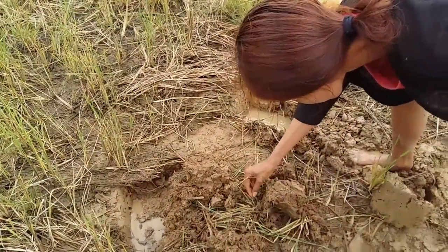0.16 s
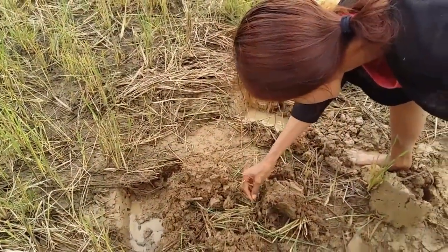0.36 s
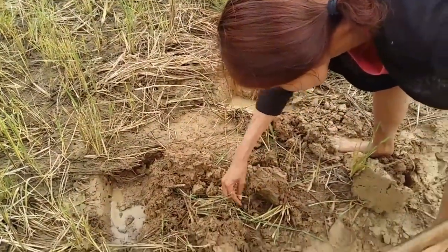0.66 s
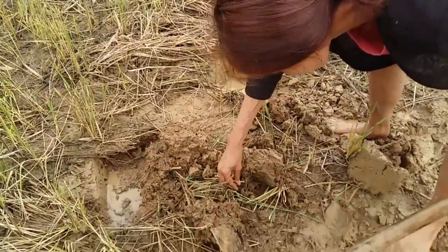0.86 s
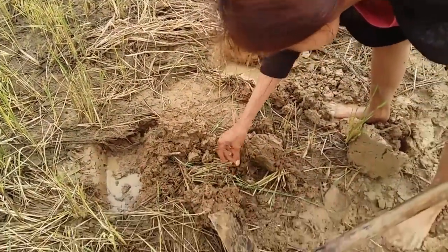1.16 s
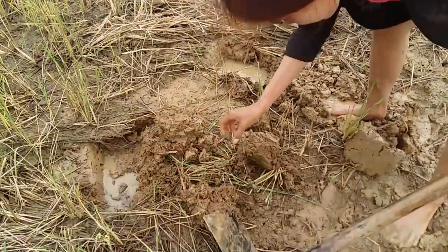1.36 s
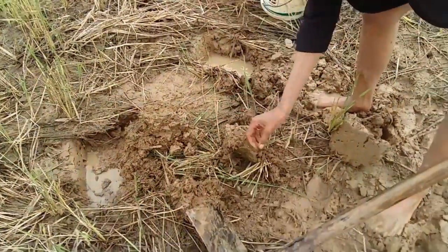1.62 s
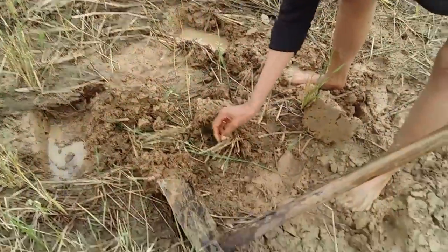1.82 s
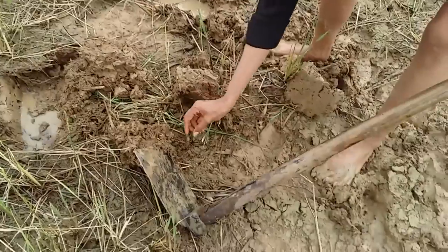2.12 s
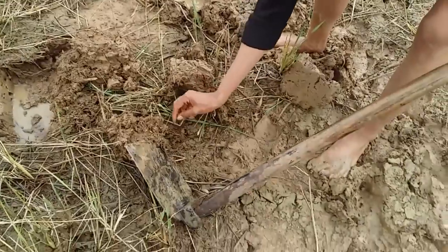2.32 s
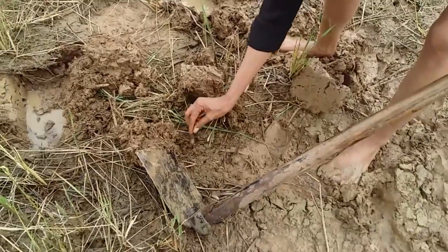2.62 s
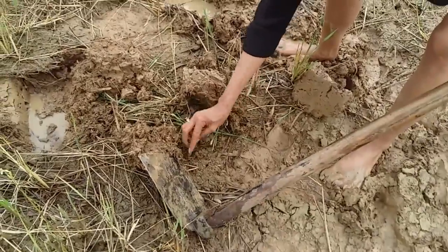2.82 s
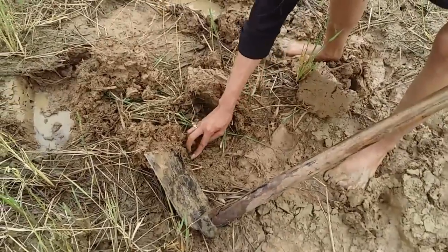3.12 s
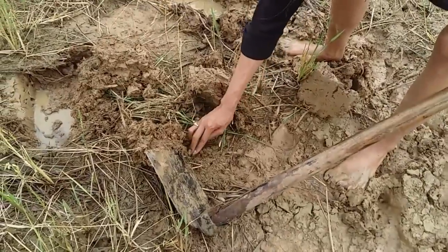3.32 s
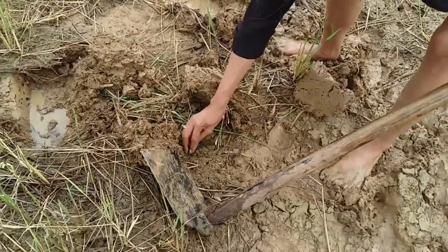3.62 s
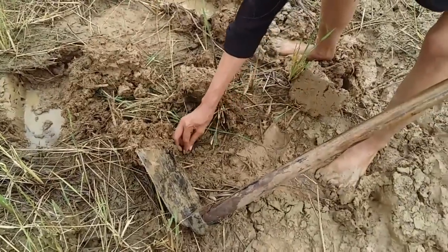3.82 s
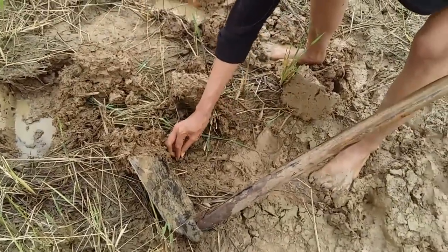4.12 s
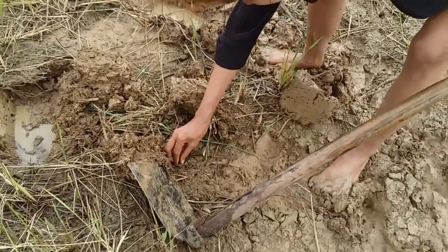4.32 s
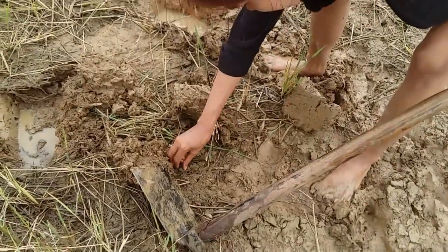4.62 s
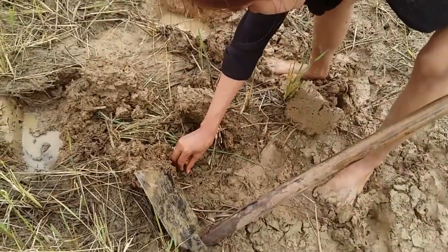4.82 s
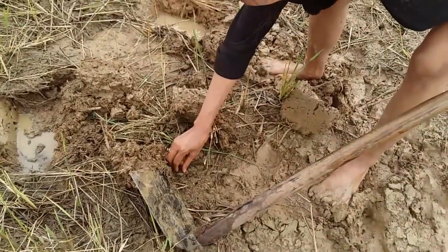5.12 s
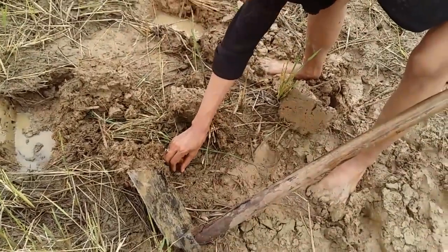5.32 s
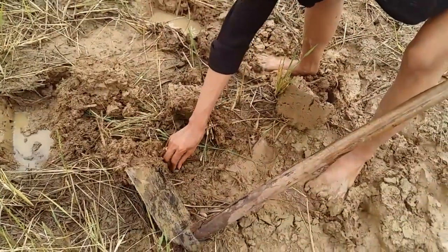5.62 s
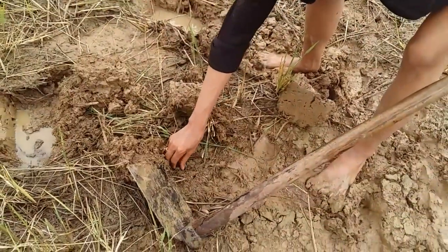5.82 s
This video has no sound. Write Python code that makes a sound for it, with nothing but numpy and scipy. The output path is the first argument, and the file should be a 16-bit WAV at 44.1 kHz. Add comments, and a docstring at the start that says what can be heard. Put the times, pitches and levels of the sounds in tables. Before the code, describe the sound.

A low wind rumble sits on the microphone for the whole six seconds, in an otherwise quiet open field. Mixed into it, slightly to the left, a distant diesel engine chugs at about nine beats a second, with other far engines humming and a soft airy hiss behind. The diesel has a light metallic clatter that fades out by about 2.5 seconds. Close by, a hand stirs soil and straw in short, faint, grainy scrapes, around 0.6 to 0.8 seconds, scattered from 1.4 to 2.9, then near 4 and 5 seconds. Far birds give tiny high chips in threes from 0.7 seconds onward. A nearer small bird on the right makes brief gliding chirps at about 2.3, 3.4, 3.8 and 5.4 seconds. Insects buzz very faintly, with a thin chorus rising on the right at around 3 seconds.

```python
"""A far diesel chugs across an open field: each firing thumps from the exhaust, and the early ones also
rattle and ring the casing. Other engines hum, and wind rumbles on a microphone held over the soil.
The microphone turns around the two-second mark, so the distant hiss changes colour and the clatter fades.
Small birds chirp in gliding whistles, insects buzz faintly, and a hand stirs soil and straw."""
import sys
import numpy as np
from scipy import signal
from scipy.fft import rfft, irfft, next_fast_len
from scipy.io import wavfile
from scipy.ndimage import uniform_filter1d, map_coordinates

SR = 44100
rng = np.random.default_rng(int(sys.argv[2]) if len(sys.argv) > 2 else 0)


def store_wav(level_fs):
    """Save 16-bit WAV to argv[1]."""
    pcm = np.round(np.clip(np.atleast_2d(level_fs), -1, 1) * 32767)
    wavfile.write(sys.argv[1], SR, pcm.T.astype(np.int16))


N = 262836
TIME = np.arange(N) / SR
TURN_START_S, TURN_END_S = 1.22, 3.14

# stereo image of the noise beds: frequency_hz, left_right_correlation
STEREO_LIKENESS = [(40, 0.72), (70, 0.96), (130, 1), (290, 0.89), (640, 0.46), (1400, 0.72), (2500, 0.84),
                   (4000, 0.39), (8000, 0.14), (15000, 0.048)]
# colours of the distant air: frequency_hz, relative_db
HISS_COLOUR_BEFORE = [(600, -31), (800, -8), (1000, -9), (1370, 2), (1650, -3), (2250, 2), (2850, 1.5),
                      (3350, -9.5), (3850, -4), (4250, -17), (4800, -9), (5400, -17.5), (6100, -25),
                      (7500, -40)]
HISS_COLOUR_AFTER = [(700, -23), (950, -4), (1120, 3.5), (1400, 2), (2000, -5.5), (2600, 5.5), (2950, -7),
                     (3400, 5), (3700, -8.5), (4050, -15), (4600, -10), (5700, -15), (6700, -20.5),
                     (7800, -41)]
MURMUR_COLOUR = [(200, 0.5), (330, -1.5), (480, -1.5), (620, -1), (800, -2), (1000, -4), (1400, -8.5)]
FIZZ_COLOUR = [(5000, -0.5), (7000, 1), (8100, -3), (8650, 4.5), (9200, -1.5), (10100, -3), (11100, 0),
               (12300, -7.5), (15600, -8.5)]
# balance before and after the turn: frequency_hz, left_over_right_db
BALANCE_BEFORE = [(1000, 4.5), (1400, 0), (1650, -1), (2100, -7.5), (3100, 1.5), (3800, -4.5), (4700, 4),
                  (6200, 9.5)]
BALANCE_AFTER = [(1000, 5), (1400, -5.5), (2100, 1.5), (2600, -2.5), (3100, -3), (4000, 3), (5000, 0),
                 (6600, 9.5)]
# fader ride of the murmur: time_s, relative_db
MURMUR_RIDE = [(0, -62), (.7, -58.5), (1.8, -60), (3.1, -63), (4.4, -64.5), (5.2, -61), (5.9, -62)]
# buzzes of a lone insect: middle_s, level_db
INSECT_BUZZES = [(.8, -80), (2.18, -74), (2.5, -75), (5.44, -73), (5.77, -75)]
# a bird's flick, which holds, peaks and plunges: time_s, base_pitch_hz, relative_db
FLICK_CONTOUR = [(0, 4064, -19), (.014, 3923, -6.5), (.021, 4060, -2), (.026, 5130, -11.5),
                 (.031, 3954, -4.5), (.038, 3340, -0.5), (.047, 2360, 3)]
# the arch of its buzz: time_s, pitch_over_crest, relative_db
BUZZ_CONTOUR = [(0, .7, 5.5), (.012, .96, 1), (.02, 1.03, 3.5), (.042, .98, 1.5), (.057, .9, 2.5),
                (.074, 0.74, -10)]
# the near bird's calls: start_s, flick_db, flick_pitch_ratio, buzz_db, crest_hz
NEAR_CALLS = [(2.257, -48, 0.97, -50, 3290), (3.795, -52.5, 0.97, -53, 3150),
              (5.381, -54, 1.07, -56.5, 3156)]
# near falling slurs and far rising whistles: start_s, start_pitch_hz, level_db
NEAR_SLURS = [(3.386, 3190, -55), (3.458, 3150, -53.5), (5.842, 2850, -58)]
FAR_WHISTLES = [(.8, 3710, -68), (1.29, 3720, -64)]
# far chips in threes: start_s, start_pitch_hz, middle_chip_db, spacing_s
FAR_TRIPLETS = [(.731, 5630, -58.5, 0.034), (.98, 5240, -64, 0.041), (1.184, 5140, -67, 0.036),
                (1.526, 5650, -59.5, 0.035), (2.465, 5670, -63.5, 0.035), (3.293, 5700, -63, 0.036),
                (4.121, 5710, -61.5, 0.037), (4.927, 5680, -64.5, 0.035), (5.432, 4800, -69, 0.033),
                (5.748, 5660, -67, 0.036)]
# soil and straw under the hand, plus two late knocks of the far diesel (2.099 s and 2.856 s): start_s,
# level_db, length_s, centre_hz
SOIL_SCRAPES = [(0.566, -52, 0.014, 2300), (0.653, -52, .024, 2470), (0.715, -47.5, 0.018, 2460),
                (0.774, -46, .03, 2340), (1.425, -51.5, 0.019, 2190), (1.439, -59.5, 0.0086, 5040),
                (1.77, -60, 0.011, 5500), (1.602, -72, 0.2, 6410), (2.099, -53, 0.017, 2820),
                (2.207, -52, 0.011, 2400), (2.856, -54, 0.021, 2450), (3.741, -48.5, 0.024, 2580),
                (3.948, -53, .02, 2600), (4.076, -52.5, 0.016, 2620), (4.918, -66, 0.0035, 6300),
                (5.061, -53.5, 0.032, 2600), (5.157, -53.5, 0.011, 2300), (5.185, -53.5, 0.029, 2800)]
# colour of the wind rumble: frequency_hz, relative_db
WIND_COLOUR = [(22, -26), (34, -26), (45, -28), (54, -2.5), (90, -1), (116, -4), (130, -3), (165, -4.5),
               (186, -9), (202, -7.5), (218, -11.5), (245, -11), (320, -24), (450, -31.5)]
# its gusts: time_s, level_db
WIND_RIDE = [(0, -39.5), (.2, -45.5), (.32, -44), (.55, -46), (.7, -42), (1, -45), (1.7, -44.5), (2.5, -46),
             (3.3, -43.5), (4.2, -44.5), (4.32, -41.5), (4.48, -46.5), (4.65, -44), (5.1, -44),
             (5.95, -43.5)]
# overtones of a faster engine: multiple_of_firing_rate, relative_db
ENGINE_OVERTONES = [(9, -1.5), (10, 2), (11, 1.5), (12, -4.5)]
# speed of the diesel: time_s, firing_rate_hz
DIESEL_RATE = [(0, 9.13), (1.1, 9.18), (1.5, 8.88), (2.6, 8.88), (3.2, 9.29), (3.7, 9.08), (4.4, 9.11),
               (4.8, 8.85), (5.5, 8.65)]
# colour of its rattle: frequency_hz, relative_db
CLATTER_COLOUR = [(600, -33), (1150, -13), (1370, -11), (1560, -2.5), (1800, 2), (2050, -4), (2450, 4.5),
                  (2900, -2), (3400, -13.5), (5200, -14.5), (7000, -36.5)]
# its knocks, about nine a second: start_s, rattle_relative_db, ring_relative_db
DIESEL_KNOCKS = [(0, -40.5, -57), (.086, -47, -43.5), (0.195, -42, -53), (0.317, -41, -49),
                 (0.432, -44, -48), (0.527, -42.5, -47), (0.649, -42, -52), (.742, -42, -47),
                 (0.849, -42, -54), (0.971, -43, -55), (1.067, -44.5, -55), (1.176, -46, -47),
                 (1.288, -43, -46), (1.396, -47, -56), (1.512, -47, -45.5), (1.624, -48, -55),
                 (1.736, -42.5, -44), (1.85, -46, -48), (1.977, -47, -49), (2.075, -46.5, -51),
                 (2.188, -48, -60), (2.415, -48.5, -48)]
# exhaust thumps after each firing: delay_s, pitch_hz, relative_db, attack_s
EXHAUST_THUMPS = [(0, 247, -3, 0.0044), (.007, 125, -1.5, .004), (.03, 158, 1, 0.0065),
                  (.078, 114, 2, .005)]
# fader ride of the exhaust: time_s, level_db
EXHAUST_RIDE = [(0, -48.5), (.7, -48.5), (2, -46.5), (3.3, -46), (3.8, -50), (4.75, -47), (5.9, -51.5)]


def amp(db):
    return 10 ** (np.asarray(db) / 20)


def unit(x):
    return x / np.sqrt(np.mean(x ** 2) + 1e-20)


def along(points, hz):
    """Read a curve on a log frequency axis."""
    knots_hz, values = np.transpose(points)
    return np.interp(np.log(hz + 1), np.log(knots_hz + 1), values)


def curve(rows):
    """An automation lane through (time_s, value) points."""
    return np.interp(TIME, *np.transpose(rows))


def wobble(rate_hz):
    """A smooth random drift."""
    knots = rng.standard_normal(int(N * rate_hz / SR) + 4)
    coarse = np.linspace(0, N / SR, 8 * len(knots))
    return np.interp(TIME, coarse, map_coordinates(knots, [coarse * rate_hz]))


def filtered(x, response):
    """Equalise x with a gain that depends on frequency."""
    size = next_fast_len(N + SR // 2)
    return irfft(rfft(x, size) * response(np.fft.rfftfreq(size, 1 / SR)), size)[..., :N]


def pan(lean_db):
    """Stereo gains; positive leans left."""
    return amp(np.array([[.5], [-.5]]) * lean_db)


def add(track, start_s, sound):
    """Mix a sound into a track."""
    part = track[..., max(0, round(start_s * SR)):][..., :sound.shape[-1]]
    part += sound[..., :part.shape[-1]]


def noise_bed(spectrum, balance=((1000, 0),), pulse=1):
    """Coloured noise of rms 1, narrow in the bass and wide in the treble."""
    def colour(hz):
        width = np.arccos(np.clip(along(STEREO_LIKENESS, hz), -1, 1)) / 2
        band_limit = (hz > spectrum[0][0] / 2) / (1 + (hz / spectrum[-1][0] / 2) ** 10)
        return amp(along(spectrum, hz)) * band_limit * [np.cos(width), np.sin(width)]
    mid, side = filtered(pulse * rng.standard_normal((2, N)), colour)
    return unit(filtered(np.array([mid + side, mid - side]), lambda hz: pan(along(balance, hz))))


def band(centre_hz, octaves):
    """Stereo noise of rms 1 around one pitch."""
    bell = lambda hz: np.exp(-.5 * (np.log2((hz + 1) / centre_hz) / octaves) ** 2)
    return unit(filtered(rng.standard_normal((2, N)), bell))


def moving_air(x, depth_db):
    """Moving air raises and lowers small patches of a distant sound."""
    spectrogram = signal.stft(x, nperseg=512)[2]
    patches = uniform_filter1d(rng.standard_normal(spectrogram.shape[1:]), size=4, axis=0)
    patches = unit(uniform_filter1d(patches, size=18, axis=1))
    return unit(signal.istft(spectrogram * amp(depth_db * patches), nperseg=512)[1][:, :N])


def from_left(x, lead_s=.00009):
    """Distant sound reaches the left port a moment before the right."""
    return filtered(x, lambda hz: np.exp(np.pi * 1j * hz * lead_s * np.array([[1], [-1]])))


def turn_angle():
    """How far the microphone has turned, from 0 to a quarter circle."""
    return np.interp(TIME, [TURN_START_S, TURN_END_S], [0, 1]) * np.pi / 2


def distant_air(fade_db_per_s=0.98):
    """Hiss, murmur, drone and fizz; the turn crossfades two hiss colours and loses the drone."""
    turned = turn_angle()
    before = amp(-53.2) * moving_air(noise_bed(HISS_COLOUR_BEFORE, BALANCE_BEFORE), depth_db=2)
    after = amp(-51.5) * moving_air(noise_bed(HISS_COLOUR_AFTER, BALANCE_AFTER), depth_db=1.86)
    chug = amp(-np.cos(2 * np.pi * firings()))  # a slight pulse in step with the diesel
    fade = amp(0.57 * wobble(25.1) - fade_db_per_s * TIME)
    hiss = fade * (np.cos(turned) * before + np.sin(turned) * chug * after)
    murmur = amp(curve(MURMUR_RIDE) + 0.93) * moving_air(noise_bed(MURMUR_COLOUR), depth_db=1.5)
    drone = amp(-71) * np.cos(turned) * band(768.6, octaves=0.046)[0]
    fizz = amp(-71) * moving_air(noise_bed(FIZZ_COLOUR), depth_db=3)
    return hiss + murmur * pan(0.68) + drone + fizz


def insects(full_s=3.37, rise_db_per_s=16, half_buzz_s=0.084):
    """A far chorus shrills in on the right with the turn; a lone insect gives brief, thin buzzes."""
    chorus_db = -63.5 - rise_db_per_s * np.maximum(full_s - TIME, 0)
    chorus = amp(chorus_db) * band(3270, octaves=0.1) * pan(-5)
    swells = sum(amp(db) * np.exp(-((TIME - s) / half_buzz_s) ** 4) for s, db in INSECT_BUZZES)
    return chorus + swells * band(7250, octaves=0.081)


def whistle(hz, edge, rasp):
    """A bird's tone with raspy pitch jitter; edge is the share spent fading in and out."""
    t = np.arange(len(hz)) / SR
    jitter = np.interp(t, np.arange(200) / 900, rng.standard_normal(200))
    envelope = signal.windows.tukey(len(t), edge)
    return envelope * np.sin(2 * np.pi * np.cumsum(hz * (1 + rasp * jitter)) / SR)


def glide(start_hz, rasp, length_s=0.0257, end_ratio=.915):
    """A soft-edged sliding note, by default a short falling chip."""
    return whistle(start_hz * np.linspace(1, end_ratio, int(length_s * SR)), edge=0.61, rasp=rasp)


def contour(points):
    """Time, pitch and level along a note."""
    s, pitch, db = np.transpose(points)
    t = np.arange(int(s.max() * SR)) / SR
    return t, np.interp(t, s, pitch), np.interp(t, s, db)


def flick(pitch_ratio):
    """A hoarse whistle that holds, flicks up and plunges; it is roughest at the top."""
    t, hz, db = contour(FLICK_CONTOUR)
    jitter = np.interp(t, np.arange(100) / 1200, rng.standard_normal(100))
    hoarse = 1 + 0.068 * (hz / hz.max()) ** 2 * jitter
    return amp(db) * whistle(pitch_ratio * hz * hoarse, edge=0.11, rasp=0.041)


def buzz(crest_hz, warble_hz=115.8, warble_from_s=0.01365):
    """A note that climbs smoothly, then sinks in a warble, loudest in its pitch troughs."""
    t, pitch, db = contour(BUZZ_CONTOUR)
    cycles = (t - warble_from_s) * warble_hz
    warble = np.clip(2 * cycles, 0, 1) * np.sin(2 * np.pi * cycles)
    hz = crest_hz * pitch * (1 + 0.092 * warble)
    return amp(db - 3.5 * warble) * whistle(hz, edge=0.11, rasp=0.041)


def outdoors(x, wet_db, t60_s=0.15):
    """Plants and ground scatter a short diffuse tail behind a call."""
    t = np.arange(SR // 3) / SR
    tail = rng.standard_normal((2, len(t))) * amp(-60 * t / t60_s)
    tail /= np.linalg.norm(tail[0])
    return x + amp(wet_db) * signal.fftconvolve(x[None], tail, axes=1)[:, :N]


def birds(buzz_delay_s=.061, swell_db=1):
    """One bird flicks, buzzes and slurs on the right; farther ones chip in swelling threes and whistle."""
    near, far = np.zeros((2, N))
    for s, flick_db, pitch_ratio, buzz_db, crest_hz in NEAR_CALLS:
        add(near, s, amp(flick_db) * flick(pitch_ratio))
        add(near, s + buzz_delay_s, amp(buzz_db) * buzz(crest_hz))
    for s, hz, db in NEAR_SLURS:
        add(near, s, amp(db) * glide(hz, rasp=0.019, length_s=0.0331, end_ratio=.86))
    for s, hz, db, spacing_s in FAR_TRIPLETS:
        add(far, s - 0.03, amp(db - 10) * glide(hz, rasp=0.027))  # a faint lead-in chip
        for k in range(3):
            add(far, s + k * spacing_s, amp(db + (k - 1) * swell_db) * glide(hz, rasp=0.02))
    for s, hz, db in FAR_WHISTLES:
        add(far, s, amp(db) * glide(hz, rasp=0.015, length_s=.16, end_ratio=1.05))
    flutter = amp(wobble(200))
    return outdoors(flutter * near, wet_db=-5.5) * pan(-9) + outdoors(flutter * far, wet_db=-4)


def soil(octaves=0.24):
    """A hand stirs crumbs and straw into short grainy scrapes; two late knocks of the far diesel sound the same
    way."""
    out = np.zeros((2, N))
    for s, db, length_s, centre_hz in SOIL_SCRAPES:
        age = np.arange(int(4 * length_s * SR)) / (length_s * SR / 2)  # 1 at the peak
        edges_hz = [centre_hz * 2 ** -octaves, centre_hz * 2 ** octaves]
        grains = rng.laplace(size=(2, len(age)))
        scrape = signal.sosfilt(signal.butter(2, edges_hz, "bandpass", fs=SR, output="sos"), grains)
        add(out, s, amp(db) * age * np.exp(1 - age) * unit(scrape))
    return out


def wind(throb_depth=0.21):
    """Wind rumbles on the microphone; the rumble throbs three times per diesel firing."""
    throb = 1 + throb_depth * np.cos(3 * 2 * np.pi * firings())
    return amp(curve(WIND_RIDE)) * noise_bed(WIND_COLOUR, pulse=throb)


def shaft_phase(rate_hz, drift):
    """Phase of a shaft whose speed wanders a little."""
    return 2 * np.pi * np.cumsum(rate_hz * (1 + drift * wobble(2))) / SR


def engine_hum(beat_s=3.78, crest_s=4.78, turn_lift_db=11):
    """Far engines drone: one hum beats slowly, a lower one wavers, and overtones lift in mid-turn."""
    beat = 1 + 0.97 * np.cos(2 * np.pi * (TIME - crest_s) / beat_s)
    hum = amp(-49.5) * beat * np.sin(shaft_phase(74.4, drift=0.00809))
    low_hum = amp(-55 + 3 * wobble(2.4)) * np.sin(shaft_phase(64.1, drift=0.0053))
    phase = shaft_phase(39.6, drift=0.0041)
    overtones = sum(amp(db + 3.2 * wobble(8.6)) * np.sin(k * phase + 0.74 * wobble(12))
                    for k, db in ENGINE_OVERTONES)
    overtones_db = -77 + turn_lift_db * np.sin(2 * turn_angle()) ** 2
    return hum + low_hum + amp(overtones_db) * overtones


def firings(first_s=.035):
    """How many times the diesel has fired, counted smoothly."""
    return np.cumsum(curve(DIESEL_RATE)) / SR - first_s * DIESEL_RATE[0][1]


def diesel_clatter(attack_s=0.0014, hold_s=0.0084, t60_s=0.19, ring_hz=1365, ring_t60_s=0.053):
    """Each knock of the single cylinder rings the casing and rattles; a weaker rattle follows."""
    t = np.arange(SR // 4) / SR
    knock = (1 - np.exp(-t / attack_s)) * amp(-60 * np.maximum(t - hold_s, 0) / t60_s)
    ring = (1 - np.exp(-t / 0.0023)) * amp(-60 * t / ring_t60_s)
    rattle_envelope, casing = np.zeros((2, N))
    for s, rattle_db, ring_db in DIESEL_KNOCKS:
        add(rattle_envelope, s - attack_s, amp(rattle_db - 7) * knock)
        add(rattle_envelope, s + 0.05, amp(rattle_db - 20) * knock)  # the rebound
        pitch_hz = ring_hz * (1 + 0.013 * rng.standard_normal())
        add(casing, s, amp(ring_db + 2.5) * ring * np.sin(2 * np.pi * pitch_hz * t))
    return rattle_envelope * noise_bed(CLATTER_COLOUR, BALANCE_BEFORE) + casing * pan(-1.7)


def diesel_exhaust(scatter_db=1.9, detune=0.039):
    """The far diesel chugs: every firing sends a sharp puff and a few duller thumps."""
    count = firings()
    firing_times = np.interp(np.arange(int(count[-1]) + 1), count, TIME)
    t = np.arange(SR // 12) / SR
    out = np.zeros(N)
    for s in firing_times:
        for delay_s, hz, db, attack_s in EXHAUST_THUMPS:
            size, bend = rng.standard_normal(2)
            envelope = t / attack_s * np.exp(1 - t / attack_s)
            tone = np.sin(2 * np.pi * hz * (1 + detune * bend) * t)
            add(out, s + delay_s, amp(db + scatter_db * size) * envelope * tone)
    return amp(curve(EXHAUST_RIDE)) * unit(out)


def scene():
    """Wind, air and engines come from the left; soil, birds and insects sit on top."""
    low_end = (wind() + diesel_exhaust() + engine_hum()) * pan(1.45)
    return from_left(low_end + distant_air() + diesel_clatter()) + soil() + birds() + insects()


def record(dry):
    """The recorder keeps nothing above its band limit."""
    return filtered(dry, lambda hz: hz < 15700)


dry = scene()
out = record(dry)
store_wav(out)
```